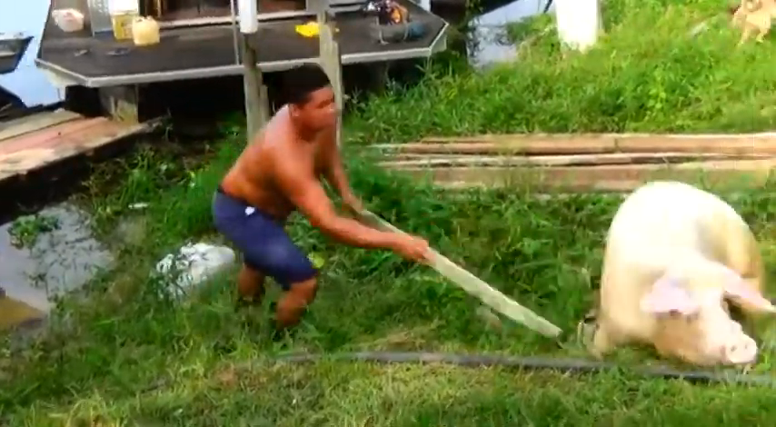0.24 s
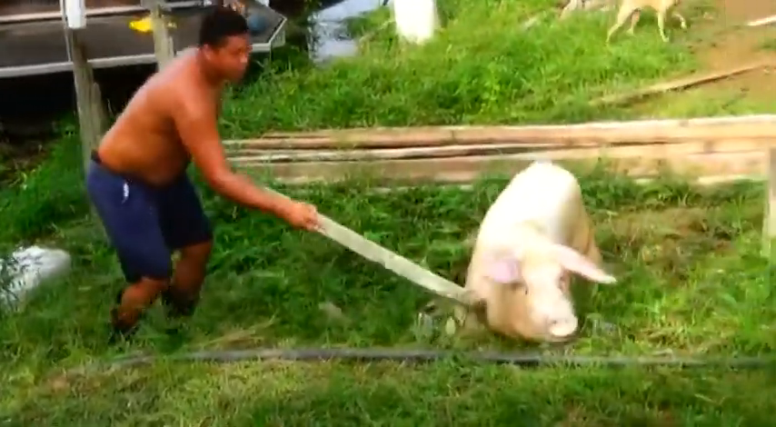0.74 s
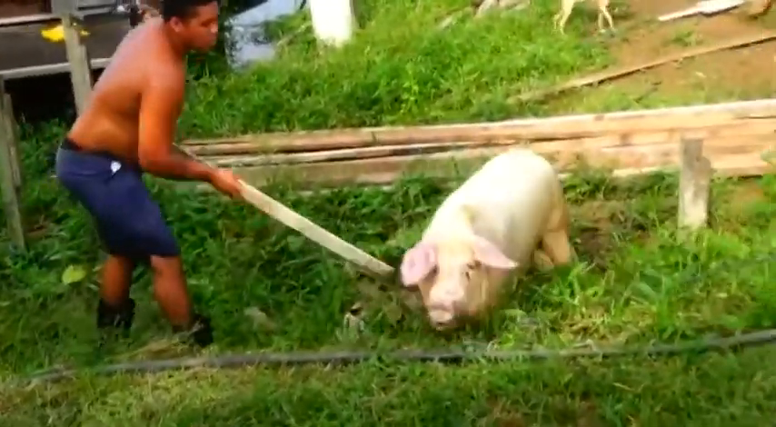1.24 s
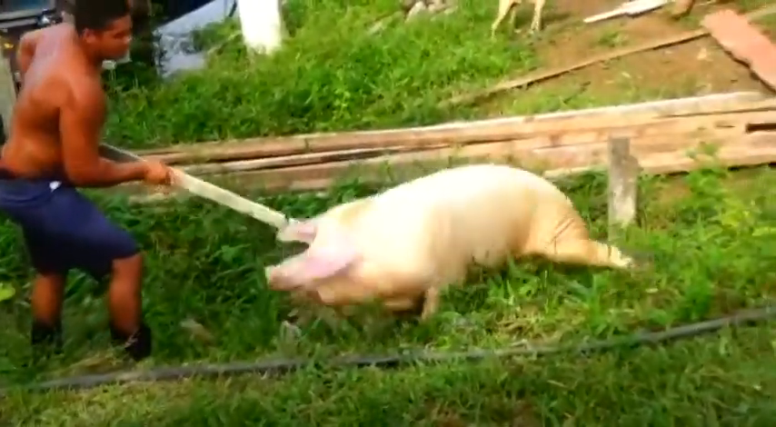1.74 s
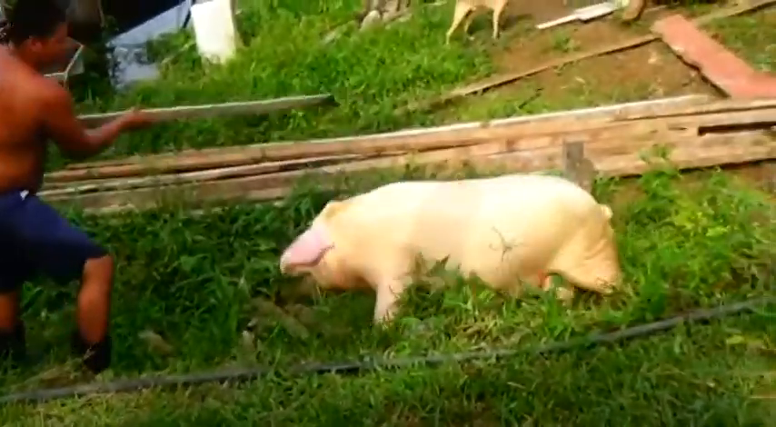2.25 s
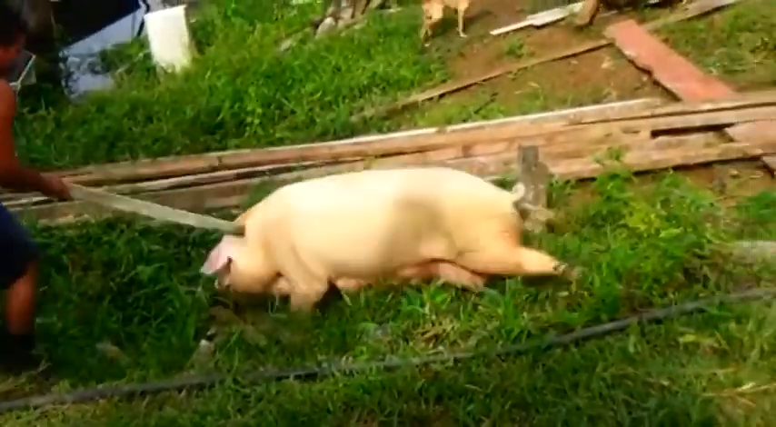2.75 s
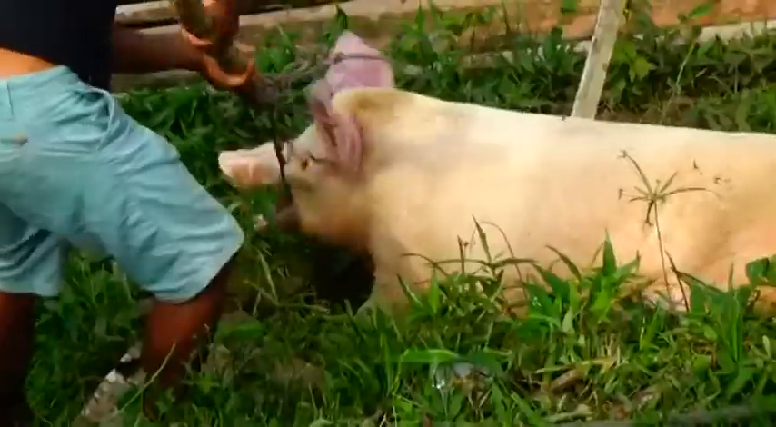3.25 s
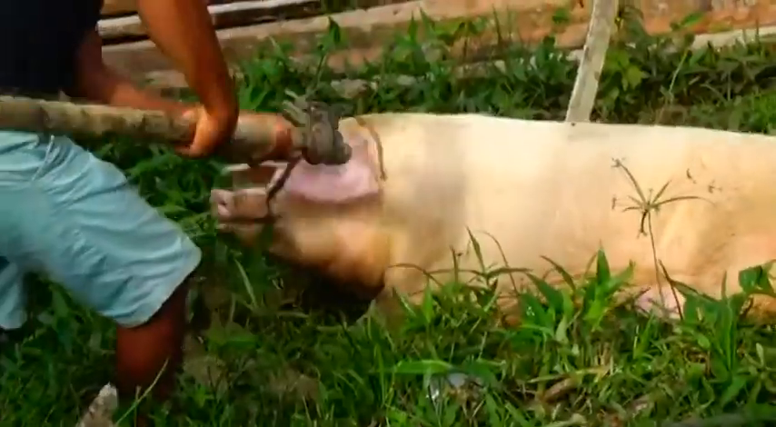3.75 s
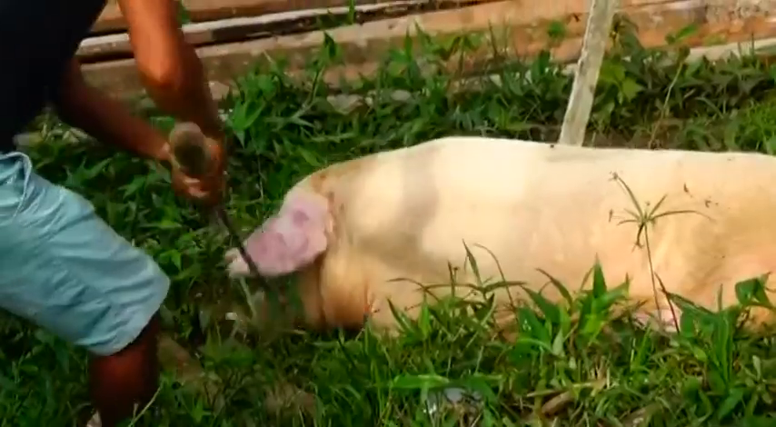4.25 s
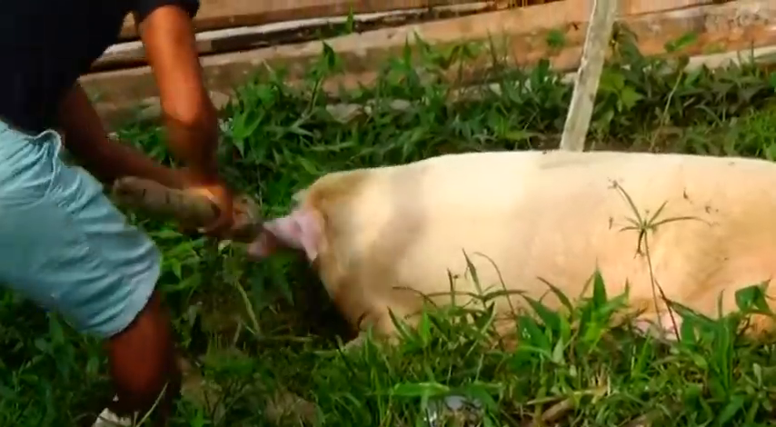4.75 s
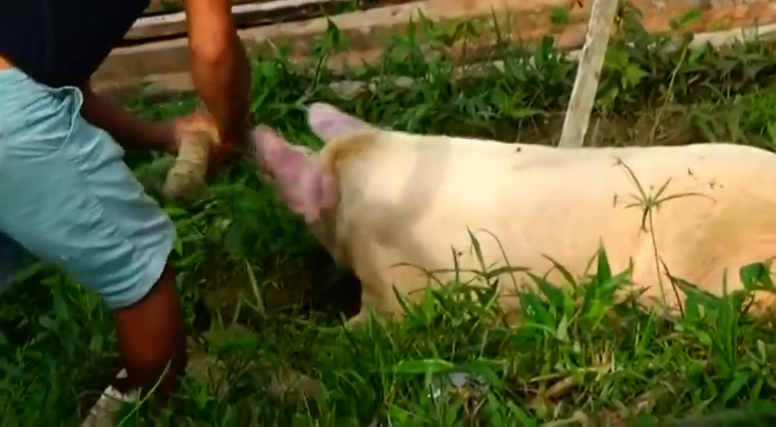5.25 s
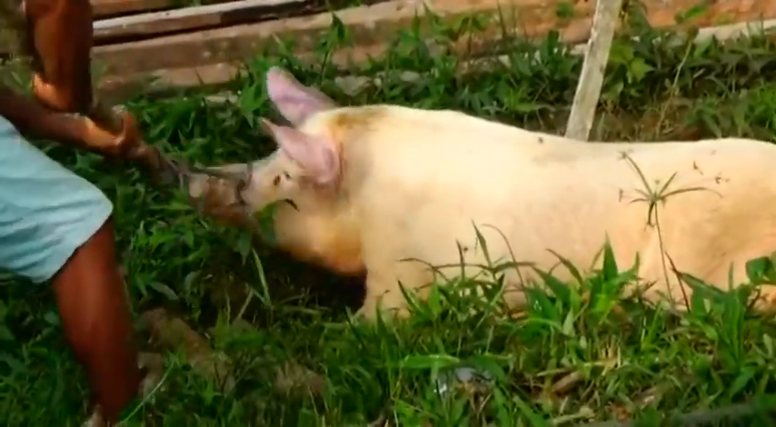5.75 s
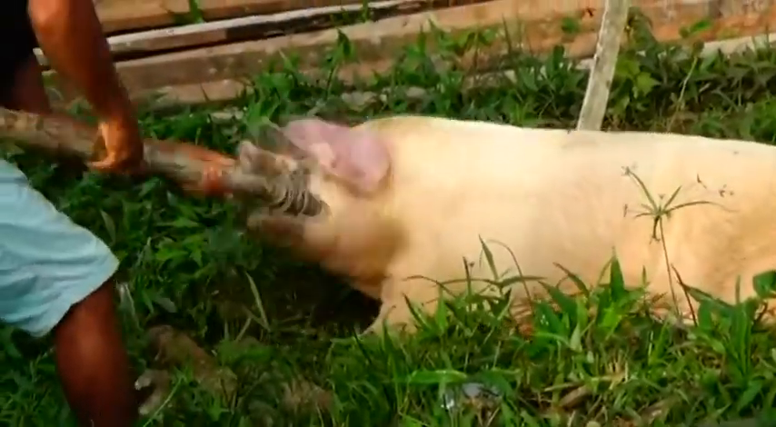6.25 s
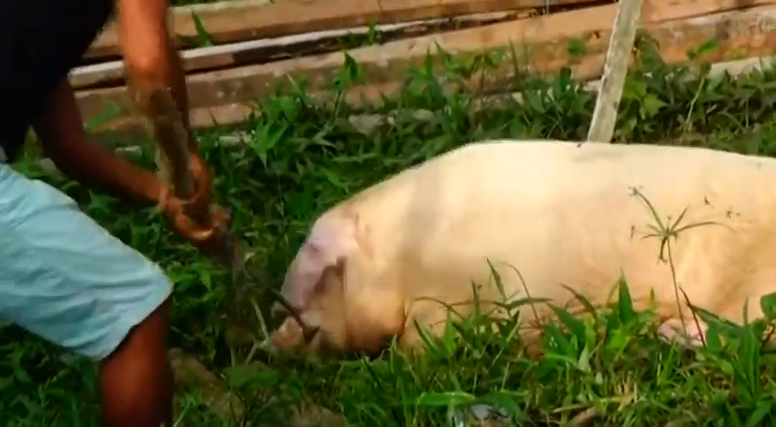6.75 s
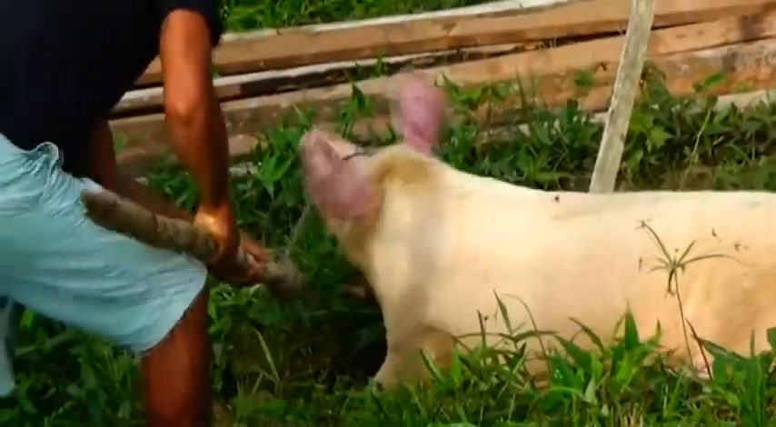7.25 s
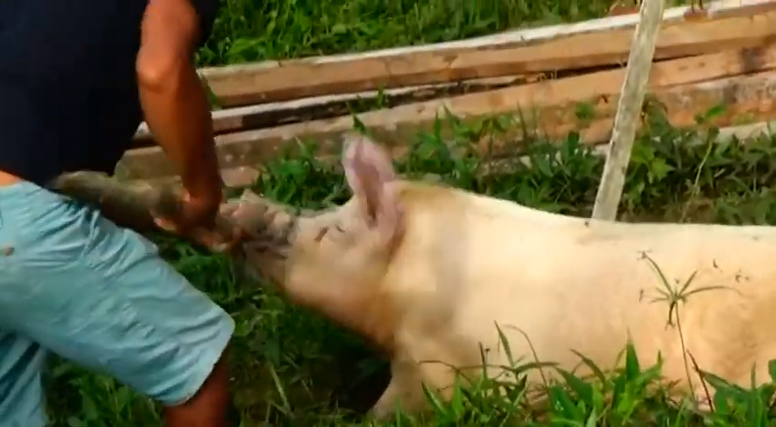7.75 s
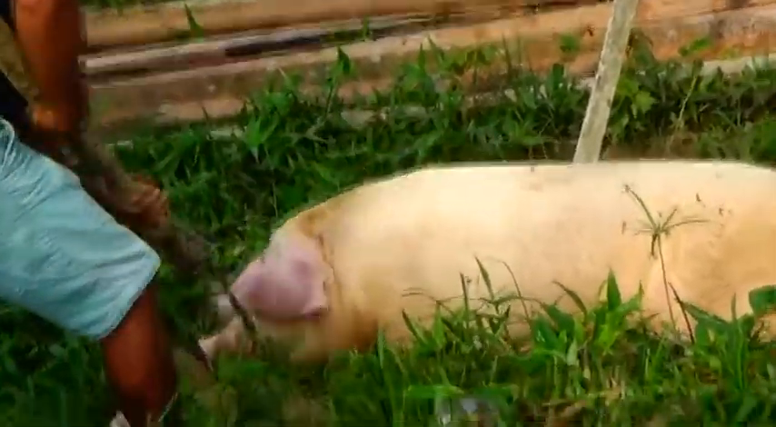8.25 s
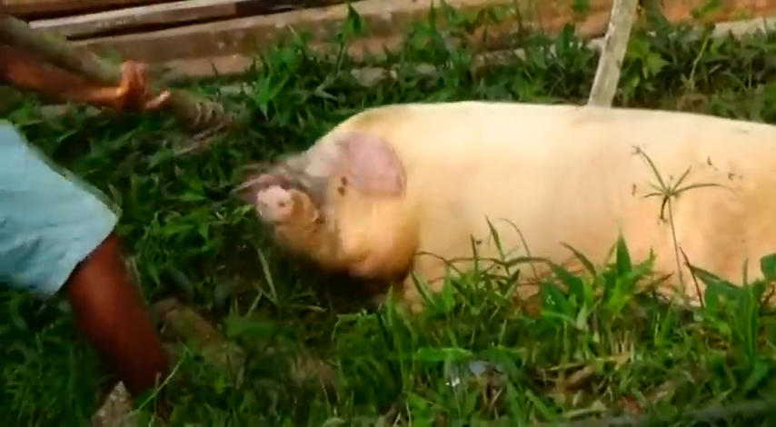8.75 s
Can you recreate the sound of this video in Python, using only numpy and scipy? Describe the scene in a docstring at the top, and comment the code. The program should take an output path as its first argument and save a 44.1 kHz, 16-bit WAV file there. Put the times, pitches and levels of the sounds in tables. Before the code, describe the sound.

A pig screams in rough, high wavering cries with creaks and yelps, then abruptly a distant one-cylinder engine chugs steadily amid insects and a bird.

```python
"""A grassy yard: a pig squeals, a rough high scream over a low throat hum, with creaks and short clear yelps.
Then the ear jumps elsewhere in the yard: a slow one-cylinder engine chugs to the left, insects sing, a bird whistles.
The pig is noise-smeared oscillators, pulses through a throat, fold clicks and coloured air noise; each engine
firing is a struck block and a rising exhaust chirp; birds are gliding tones; the yard is patchy coloured noise."""
import sys
import numpy as np
from scipy import signal
from scipy.fft import rfft, irfft, next_fast_len
from scipy.io import wavfile
from scipy.ndimage import uniform_filter1d, map_coordinates

SR = 44100
rng = np.random.default_rng(int(sys.argv[2]) if len(sys.argv) > 2 else 0)


def digitize_waveform(pressure):
    """Quantize a signal to 16-bit integers and store it at the path in sys.argv[1].

    Rows of a 2-D input are taken as channels; values are limited to [-1, 1].
    """
    field = np.atleast_2d(pressure).T
    bounded = np.clip(field, -1, 1)
    quanta = np.round(bounded * 32767).astype(np.int16)
    wavfile.write(sys.argv[1], SR, quanta)


N = 396900
JUMP_S = 3.1642  # the pig's place before, the engine's place after
STEADY_DB = 1.5  # patchiness of steady noises

# slow slaps of the vocal folds [start t/s, length/s, first and last rate/Hz, first and last level/dB,
# brightness/dB, share of the voice cut between slaps]
CREAKS = [(.41, 0.126, 87.96, 82.9, -25, -17, -2.5, 0.87), (.545, 0.046, 92.2, 93.3, -18.5, -13, -12, 1),
          (.606, 0.07, 67.5, 67.7, -19, -8, -6.5, 0.52), (1.151, 0.1, 44.4, 70.8, -22, -14, -10.5, 0.71),
          (3.013, 0.02795, 78.1, 76.8, -44, -33, 8, 0.96), (3.055, 0.1, 68.15, 78.1, -19, -14.5, -6, 0.66)]
# middle band of the pig's breath noise [f/Hz, density/dB]
BREATH_MID = [(1200, -78), (1950, 4), (2300, -4), (3060, -3.5), (3700, -3.5), (4800, -26), (6200, -30)]


def amp(db):
    """Amplitude factor of a level in dB."""
    return 10 ** (np.asarray(db) / 20)


def unit(x):
    """x scaled to rms 1."""
    return x / np.sqrt(np.mean(x ** 2) + 1e-20)


def along(points, hz):
    """Reads (Hz, value) points on a log frequency axis."""
    f, v = np.transpose(points)
    return np.interp(np.log(hz + 1), np.log(f + 1), v)


def curves(tables, fade_s=0.0035):
    """A gate that is open inside each table's span, then one value per sample for each column."""
    t = np.arange(N) / SR
    gate = 0
    for rows in tables:
        from_edge = np.minimum(t - rows[0][0], rows[-1][0] - t)
        gate = gate + np.clip((from_edge + fade_s) / fade_s, 0, 1)
    s, *cols = np.concatenate(tables).T
    return [np.minimum(gate, 1)] + [np.interp(t, s, c) for c in cols]


def wobble(rate):
    """A smooth random curve, rate knots a second."""
    at = np.arange(0, N + 16, 16)
    knots = rng.standard_normal(int(N * rate / SR) + 4)
    return np.interp(np.arange(N), at, map_coordinates(knots, [at * rate / SR]))


def filtered(x, response):
    """x times a complex response of frequency."""
    m = next_fast_len(N + SR // 2)
    return irfft(rfft(x, m) * response(np.fft.rfftfreq(m, 1 / SR)), m)[..., :N]


def noise(spectrum, patchy_db, tall=5, long=10):
    """Coloured noise of rms 1 with patches of random gain, tall bins by long frames."""
    z = signal.stft(rng.standard_normal(N), nperseg=512)[2]
    field = uniform_filter1d(rng.standard_normal(z.shape), size=tall, axis=0)
    field = uniform_filter1d(field, size=long, axis=1)
    x = signal.istft(z * amp(patchy_db * unit(field)), nperseg=512)[1][:N]
    return unit(filtered(x, lambda hz: amp(along(spectrum, hz))))


def phase(hz):
    """Running phase in radians of a gliding pitch."""
    return 2 * np.pi * np.cumsum(hz) / SR


def fuzzy(turn, rough, spread_hz):
    """A tone that trades part of its power for a noise band around it."""
    share = np.clip(rough, 0, 1)
    smear = wobble(spread_hz) * np.sin(turn) + wobble(spread_hz) * np.cos(turn)
    return np.sqrt(2 - 2 * share) * np.sin(turn) + np.sqrt(share) * smear


def resonator(f, centre, width):
    """Complex response of one resonance, 1 at its centre."""
    return 1j * f * width / (centre * centre - f * f + 1j * f * width)


def yard(late):
    """Far machinery drones, leaves rustle and insects buzz in one high band, all as patchy noise."""
    # [t/s, drone level/dB, insect level/dB, leaf level before a trim/dB], one list for each place
    levels = [
        [(0, -53, -58, -46), (1, -49, -61, -45.5), (2.7, -53, -54.5, -40.5), (3.16, -49, -56, -46)],
        [(3.17, -50.5, -56.5, -44.5), (6, -49, -54.5, -46), (9, -49, -53.5, -45)],
    ]
    # drone colour in the pig's place, then in the engine's place [f/Hz, density/dB]
    drone_before = [(18, -66), (30, -44), (166, -0.5), (540, -0.5), (1270, -3), (1830, -5.5), (3330, -10),
                    (3550, -49), (5000, -27), (6500, -62), (11000, -120)]
    drone_after = [(20, -11), (60, -11), (150, -2.5), (255, -6.5), (340, 1), (440, -4), (510, 2.5),
                   (630, -1), (900, -1.5), (1250, -14), (1750, -5.5), (2300, -8), (3500, -11.5),
                   (5000, -30), (8000, -60)]
    # leaf rustle [f/Hz, density/dB]
    leaf_color = [(2060, -45), (3500, -15), (4550, -11.5), (8240, -8.5), (9700, -8.5), (10900, -10.5),
                  (13800, -21), (15600, -25)]

    _, drone_db, insect_db, leaf_db = curves(levels)
    drone = np.where(late, noise(drone_after, STEADY_DB), noise(drone_before, 2 * STEADY_DB))
    insect_color = [(7500, -84), (9300, -0.5), (9750, 0.5), (10200, -4.5), (12500, -84)]
    insects = noise(insect_color, 0.81) * amp(1.6 * wobble(150))
    leaves = noise(leaf_color, 3.8)
    return amp(drone_db) * drone + amp(insect_db) * insects + amp(leaf_db - 6.5) * leaves


def rushing_air(low, air_db, hiss_db, mouth_hz):
    """Turbulent breath: air rings in the open mouth among three noise bands, chopped by the humming folds."""
    # chesty low band, then hissing top band [f/Hz, density/dB]
    body_color = [(250, -19), (450, -14.5), (640, -4.5), (840, -75), (1050, 2.5), (1250, -6), (1450, 4.5),
                  (1700, 4), (1950, -20), (2400, -62)]
    hiss_color = [(2650, -37), (4500, -4), (5890, 1), (7210, -6), (8330, -0.5), (10200, -3.5),
                  (12400, -13.5), (15500, -35)]

    def streaky(spectrum):
        return noise(spectrum, 4.5, tall=2, long=12)

    # as the breath weakens the low band is lifted against the rest, up to a limit
    body_db = np.minimum(-2 + (-20 - air_db), 14)
    braid = 1 + 1.2 * np.cos(low) + .8 * np.cos(2 * low)  # the hum splits each band into strands
    ring = fuzzy(phase(mouth_hz), 1, 260) + .5 * fuzzy(phase(1.5 * mouth_hz), 1, 260)
    air = 0.29 * braid * ring / 1.4 + .33 * streaky(BREATH_MID)
    air = air + amp(hiss_db + 2.0) * streaky(hiss_color) + amp(body_db - 10.0) * streaky(body_color)
    flutter = amp(air_db + 1.5 * wobble(90)) * (1 + .5 * np.cos(low))
    return flutter * air


def held_tones():
    """Steady tones under the scream, each swelling to a peak and sinking."""
    # [start t/s, length/s, f/Hz before waver, peak level/dB before flicker]
    tones = [(0.407, .1, 740, -22), (1.36, 0.38, 1008, -14.5), (3.059, 0.079, 581.3, -25)]
    peak_share, edge_db = 0.59, -15.5  # where in its length the peak falls; level of both ends against it

    swells = [[(s, f, g + edge_db), (s + peak_share * d, f, g), (s + d, f, g + edge_db)]
              for s, d, f, g in tones]
    on, hz, db = curves(swells)
    tone = fuzzy(phase(hz * (1 + .02 * wobble(14))), 0.45, 140)
    return on * amp(db + 3.2 * wobble(29.95)) * tone


def squeal(chop):
    """Two oscillators at once: the low hum beats against the high scream and gives it side lines."""
    # scream [t/s, pitch f/Hz before waver, level/dB, roughness 0-1]
    scream_rows = [
        [(0.0, 1561, -33, 0), (.05, 1547, -33, 0.15), (.09, 1510, -29, 0.02), (0.17, 1427, -28, 0),
         (.21, 1417, -27, 0.05), (0.25, 1344, -27, 0.23), (.275, 1272, -21.5, 0), (0.3, 1244, -16, 0),
         (.36, 1234, -15.5, 0.04), (0.39, 1233, -18, 0.57), (0.43, 1325, -26.5, 0.4), (0.57, 1319, -27.5, 0.45),
         (0.64, 1366, -23, 0.4), (0.66, 1356, -14, 0.2)],
        [(1.22, 1022, -33, 0.35), (1.245, 1056, -19.5, .4), (1.344, 1013, -28.5, 0.49), (1.55, 1116, -19, 0.5),
         (1.66, 1181, -25, 0.65), (1.7, 1257, -19, 0.53), (1.84, 1408, -24.5, 0.55), (1.986, 1581, -26, 0.34),
         (2.128, 1525, -16, 0.04), (2.196, 1352, -26, 0.34), (2.27, 1203, -18.5, 0.58),
         (2.338, 1080, -22, 0.52), (2.384, 1002, -28, 0.34), (2.41, 1156, -20, 0.17), (2.5, 1310, -33, 0.22)],
        [(3.015, 1214, -42, 0.42), (3.09, 1172, -27, 0.39), (3.17, 1280, -21, 0.44)],
    ]
    # throat hum [t/s, low tone f/Hz before waver, level/dB]
    hum_rows = [
        [(0.0, 382.8, -44.5), (0.17, 325.2, -48.5), (.24, 332.6, -42.5), (0.344, 297, -45), (0.5, 297.1, -39.5),
         (0.62, 309.8, -28.5)],
        [(1.17, 283, -34), (1.23, 287.5, -23.5), (1.4, 273.7, -32), (1.65, 279.9, -40), (1.7, 323.8, -37),
         (1.994, 394.1, -39), (2.194, 353.2, -35.5), (2.294, 348.7, -52), (2.38, 379.6, -31.5)],
        [(3.03, 300.6, -38), (3.17, 312.8, -34)],
    ]
    # rushing air [t/s, level/dB, hiss against it/dB, mouth resonance f/Hz]
    air_rows = [
        [(0.0, -21, -7, 3140), (0.08, -22, -5.5, 3060), (0.2, -27, 0, 3080), (0.33, -32, 8, 2510),
         (0.416, -21.5, -19, 2870), (0.564, -51.5, -3.5, 2710), (0.608, -42, 2, 2570), (0.688, -34, -7.5, 2460),
         (0.76, -65, 13, 2530)],
        [(0.88, -73, 14, 2650), (0.912, -45, 4, 2650), (0.94, -32, -10, 2650), (1.04, -49, -1.5, 2650)],
        [(1.165, -64, 6, 2660), (1.173, -54, 0, 2730), (1.269, -25, -9, 2920), (1.445, -19.5, -11.5, 3160),
         (1.713, -24.5, -6.5, 2640), (1.967, -19, -7.5, 3210), (2.027, -22, -3.5, 3060),
         (2.045, -15, -10.5, 3080), (2.107, -22.5, -3, 3050), (2.277, -20, -8.5, 2600),
         (2.453, -27.5, -17, 2700), (2.633, -33, -21, 2560), (2.689, -38, -4, 2670), (2.74, -48, -32, 2560)],
        [(3.0, -60, 4, 2580), (3.054, -34.5, -21, 2490), (3.16, -21, -10.5, 2950), (3.17, -41, -3, 2920)],
    ]
    # lines the hum adds around each overtone [multiple of the hum, level/dB]
    side_lines = [(0, 0), (.5, -6), (1, -4), (-.5, -9)]
    nasal_above_hz, nasal_db = 345, 0.5  # a nasal tone rides this far above the low tone
    mouth_width_hz = 356
    torn_db = 4.5  # each side line breaks up on its own

    hum_on, low_hz, low_db = curves(hum_rows)
    low = phase(low_hz * (1 + 0.0142 * wobble(40.9)))
    nasal = amp(nasal_db) * fuzzy(phase(low_hz + nasal_above_hz), 0.42, 90)
    hum = hum_on * amp(low_db) * (fuzzy(low, 0.53, 60) + nasal)

    air_on, air_db, hiss_db, mouth_hz = curves(air_rows)
    on, hz, db, rough = curves(scream_rows)
    waver = .01 * wobble(50) + .012 * wobble(16)  # fast and slow unsteadiness
    high = phase(hz * (1 + (0.195 + 2 * rough) * waver))

    def strands(k, smear):
        return sum(amp(g + torn_db * wobble(35)) * fuzzy(k * high + m * low, smear, 130)
                   for m, g in side_lines)

    scream = fuzzy(high, .7 * rough + .08, 200) + .4 * fuzzy(high + low / 2, rough + .2, 200)
    scream = amp(db) * scream
    # the octave follows the breath, loudest where it meets the mouth resonance
    octave = amp(air_db - 2 - 4.8 * rough) / np.hypot(1, (2 * hz - mouth_hz) / mouth_width_hz)
    scream = scream + octave * strands(2, .6 * rough + .45)
    for k in range(3, 7):  # upper overtones follow the hiss and blur into wavy bands
        upper_db = air_db + np.minimum(hiss_db, 0) - 4.5 - 2.5 * (k - 3) - 2
        scream += amp(upper_db) * strands(k, .5 * rough + .6)
    beat = 1 + 0.08 * np.cos(low) + 0.089 * np.cos(2 * low)

    leak = amp(on * (6.9 * rough - 1.5))  # a clear scream leaks less air
    air = air_on * rushing_air(low, air_db, hiss_db, mouth_hz) * leak
    return held_tones() * (1 + 2 * chop) / 3 + chop * (hum + on * beat * scream + air)


def through_nose(pig):
    """The open nose absorbs one band of the voice while its passage is open."""
    # nasal moments [start t/s, end t/s, opening 0-1, absorbed centre f/Hz]
    openings = [(0.106, 0.327, 0.4, 2280), (.26, 0.417, 0.95, 1800), (0.273, 0.386, 1, 3470),
                (1.29, 1.897, 0.93, 1947)]
    # absorbed band [share of its centre f, level/dB]
    notch = [(.85, 0), (.93, -12), (.98, -34), (1.02, -34), (1.07, -12), (1.15, 0)]
    move_s = .08  # time the nose takes to open or shut

    for a, b, wide, nose_hz in openings:
        on, nasal = curves([[(a, 0), (a + move_s, wide), (b - move_s, wide), (b, 0)]])
        share = on * np.clip(nasal - 0.09 * np.abs(wobble(15)), 0, 1)
        absorbed = filtered(pig, lambda hz: amp(along(notch, hz / nose_hz)))
        pig = pig + share * (absorbed - pig)
    return pig


def throat(f):
    """The pig's fixed airway resonances, with alternating sign."""
    # [centre f/Hz, width/Hz, level/dB]
    airway = [(670, 610, -2), (977, 300, 5.5), (1280, 56, -3), (1890, 540, -14.5), (2600, 117, -0.5),
              (3900, 550, -64)]
    return sum((-1) ** k * amp(db) * resonator(f, c, w) for k, (c, w, db) in enumerate(airway))


def slaps():
    """Rows (s, dB, brightness dB, cut) of single fold slaps: rate and strength glide through each creak."""
    scatter_s, scatter_db = .001, 2
    rows = []
    for s, d, rate0, rate1, db0, db1, bright_db, cut in CREAKS:
        u, chance = np.linspace(0, 1, 200), rng.standard_normal((30, 2))
        done = d * (rate0 * u + (rate1 - rate0) * u ** 2 / 2)  # slaps so far
        shares = np.interp(np.arange(int(done[-1]) + 1), done, u)
        for at, (late, size) in zip(shares, chance):
            slap_db = db0 + (db1 - db0) * at + scatter_db * size
            rows.append((s + d * at + scatter_s * late, slap_db, bright_db, cut))
    return rows


def chopped(rows, t60):
    """While the folds creak, the voice comes in bursts: open at each slap, shut before the next."""
    t, open_, creaking = np.arange(N) / SR, np.zeros(N), np.zeros(N)
    for s, *_, cut in rows:
        near = slice(round(s * SR) - 200, round(s * SR) + 800)
        since = t[near] - s
        open_[near] = np.maximum(open_[near], (since >= 0) * amp(-60 * np.abs(since) / t60))
        creaking[near] = np.clip(cut, 0, 1)
    return 1 + uniform_filter1d(creaking, size=300) * (1.66 * uniform_filter1d(open_, size=20) - 1)


def creaks(rows):
    """Single slow slaps of the folds, each a click that rings the throat and a short puff."""
    dull, bright, t = np.zeros(N + SR), np.zeros(N + SR), np.arange(900) / SR
    click = 0.26 * amp(-60 * t / 0.00031)
    ring = np.sin(2 * np.pi * 1320 * t) * amp(-60 * t / 0.0065)  # the half-shut mouth rings on
    sharp_front = 1 + 2.5 * amp(-60 * t / .005)
    for s, db, bright_db, _ in rows:
        here = slice(round(s * SR), round(s * SR) + len(t))
        puff = amp(-60 * t / .03) * rng.standard_normal(len(t))
        dull[here] += amp(db) * (1.9 * puff + click + .5 * ring)
        bright[here] += amp(db + bright_db + 2) * puff * sharp_front
    throaty = filtered(dull[:N], lambda hz: throat(hz) / (1 + (hz / 3600) ** 4))
    return throaty + filtered(bright[:N], lambda hz: amp(along(BREATH_MID, hz)))


def yelps():
    """Short cries: fold pulses through the throat; an open mouth lifts the upper overtones."""
    # short cries [start t/s, length/s, pitch f/Hz after the rise, before the fall, level/dB there, there,
    # mouth opening/dB, roughness 0-1]
    short_cries = [(0.592, .14, 348, 318, -16.5, -21, 2, 0.6),
                   (0.884, .13, 332.4, 317, -15.5, -21, -2, 0.19)]
    # a longer cry that frays [t/s, pitch f/Hz, level/dB, mouth opening/dB, roughness, two lowest tones/dB]
    last_cry = [(2.38, 266.6, -29, -20, 0.12, 4), (2.42, 300.2, -11, -8, 0.21, -9),
                (2.46, 303.8, -4.5, -16.5, .15, -11.5), (2.53, 333, -13.5, -7, 0.41, -5),
                (2.585, 373, -22.5, 1, .65, 5), (2.62, 386, -13.5, -11, 0.7, -2.5),
                (2.65, 331.7, -15.5, -9, 0.84, -6), (2.68, 269, -29, -14, 1.31, 2)]
    rise_s, fall_s = 0.036, .045
    slack, edge_db, shut_db = .71, -13, -21  # slack folds (pitch share) and a shut mouth at both ends
    frays_per_s = 6  # roughness grows through a yelp
    open_jaw_hz = 1600  # the wide jaw favours overtones near this pitch

    cries = []
    for s, d, f0, f1, g0, g1, wide, r in short_cries:
        frayed = r * (1 + frays_per_s * d)
        cries.append([(s, slack * min(f0, f1), g0 + edge_db, wide + shut_db, r, 0),
                      (s + rise_s, f0, g0, wide, r, 0),
                      (s + d - fall_s, f1, g1, wide, frayed, 0),
                      (s + d, slack * f0, g1 + edge_db, wide + shut_db, frayed, 0)])
    on, hz, db, open_db, rough, low_db = curves(cries + [last_cry])
    turn = phase(hz * (1 + 0.00688 * wobble(60)))
    tone = 0
    for k in range(1, 13):
        if k > 3:
            lift = amp(open_db) * (1 + 1.6 / (1 + ((k * hz - open_jaw_hz) / 300) ** 2))
        else:
            lift = amp(low_db * (k < 3))
        way = throat(k * hz)
        overtone = fuzzy(k * turn + np.angle(way), rough * min(1, k / 3), 210)
        tone = tone + lift * np.abs(way) * overtone
    level = amp(db - 7.5 + 0.86 * np.minimum(rough, 1) * wobble(18))
    alternation = 1 + 0.4 * rough * np.cos(turn / 2)  # strong and weak pulses alternate
    return on * level * tone * alternation


def ticks():
    """Small dry ticks in the grass: short puffs of noise, each around its own centre."""
    # [t/s, level/dB, centre f/Hz]
    puffs = [(1.105, -40, 8800), (1.128, -36, 7890), (2.872, -37.5, 1490), (2.886, -35, 1426)]
    out, t = np.zeros(N), np.arange(900) / SR
    for s, db, hz in puffs:
        band = signal.butter(1, [.6 * hz, 1.5 * hz], "band", fs=SR)
        puff = signal.lfilter(*band, rng.standard_normal(len(t)))
        out[round(s * SR):][:len(t)] += amp(db - 60 * t / 0.068) * 2 * puff
    return out


def firings():
    """Sample times of the firings: the governor hunts, so a small lag swings slowly to and fro."""
    first_s, cycle_s = 3.19962, .0708673
    hunt_s, swing, latest = .0013, 36.5, 23.5  # greatest lag; firings a swing; firing of greatest lag
    n = np.arange(-1, 83)
    lag = hunt_s * np.cos(2 * np.pi * (n - latest) / swing)
    return np.round((first_s + cycle_s * n + lag) * SR).astype(int)


def engine():
    """Each firing: a knock in the block, then the exhaust pipe lets out a chirp that rises, low notes first."""
    # [t/s, exhaust level/dB, knock level/dB, knock pitch f/Hz, buzz of a loose part/dB], before trims and scatter
    course = [(3.17, -47.5, -39.5, 2108, -60), (4, -44.5, -38.5, 1947, -58), (5, -44, -38.5, 1810, -60),
              (6, -42.5, -39, 1940, -60), (6.9, -42.5, -41.5, 1940, -52.5), (7.5, -42, -38, 1880, -52.5),
              (8.3, -42.5, -35.5, 1633, -49.5), (9, -43.5, -36.5, 1670, -55.5)]
    # noise of the knock [f/Hz, density/dB]
    knock_color = [(60, -25), (400, -13.5), (760, -7), (1050, -5.5), (1300, -23), (1600, -0.5), (1960, 1),
                   (2610, -8.5), (2990, -11), (3350, -11), (5150, -21), (9000, -18), (11700, -32),
                   (19800, -120)]
    # exhaust pipe resonances [centre f/Hz, width/Hz, lift as a factor]
    pipe_modes = [(335, 24, 1.6), (440, 28, 2.6), (560, 26, 1.2), (640, 34, 2.2), (730, 26, 1.4),
                  (880, 60, 1.2)]
    pipe_low_hz = 120  # the exhaust radiates little below this
    lead_s, lead_pitch = .014, .9  # lead-in before the main blow; pitch share of the softer knock

    _, exhaust_db, knock_db, knock_hz, rattle_db = curves([course])
    at = firings()
    t = np.arange(3200) / SR - lead_s
    after = np.maximum(t - .0012, 0)
    sweep = phase((240 + 470 * np.clip(after / 0.013, 0, 1)) * (after > 0))
    # a dip, then a second push as the wave returns
    swell = 1 - .5 * np.exp(-((after - .0072) / 0.0022) ** 2) + 0.5 * np.exp(-((after - .01) / 0.0004) ** 2)
    push = swell * np.clip(after / 0.0025, 0, 1) * amp(-60 * np.maximum(after - .012, 0) / 0.026)
    thump = np.sin(2 * np.pi * 185 * after) * amp(-60 * after / .06) * np.clip(after / .003, 0, 1)
    valve = 0.17 * np.sin(2 * np.pi * 560 * (t + 0.00978)) * np.exp(-((t + 0.0016) / 0.003) ** 2)

    lead = 0.75 * np.exp(-((t + 0.0045) / 0.003) ** 2)  # a softer, lower knock before the main blow
    main = np.exp(-(t / 0.0023) ** 2) + 0.18 * np.exp(-((t - .005) / 0.009) ** 2)
    snap = np.exp(-(t / .0018) ** 2)  # the upper modes sound only at the main blow
    burst = 0.92 * (lead + main) + 2.6 * (t > 0) * amp(-60 * t / 0.052)

    def pipe_response(f):
        modes = 1 + sum(g * resonator(f, c, w) for c, w, g in pipe_modes)
        return f ** 4 / (f ** 4 + pipe_low_hz ** 4) * modes

    pipe, ring, gate = np.zeros((3, N + SR))
    chance = rng.standard_normal((len(at), 5))
    for i, (size, tone, hard, jog, gas) in zip(at - round(lead_s * SR), chance):
        chirp = push * np.sin(sweep * amp(.05 * gas))
        pipe[i:i + len(t)] += amp(1.03 * size) * (chirp + 0.71 * thump + valve)
        i += round(30 * jog)  # the knock lands a little early or late
        # modes of the block, struck unevenly
        block = 2 * np.pi * knock_hz[min(i, N - 1)] * amp(0.37 * tone) * t
        soft_knock = lead * amp(3 * gas) * np.sin(lead_pitch * block + 3 * size)
        upper = .6 * amp(3 * jog) * np.sin(1.35 * block) + .55 * amp(3 * size) * np.sin(1.95 * block)
        ring[i:i + len(t)] += amp(1.5 * hard) * (main * np.sin(block) + soft_knock + snap * upper)
        gate[i:i + len(t)] += amp(hard) * burst
    exhaust = unit(filtered(pipe[:N], pipe_response))
    clatter = unit(filtered(gate[:N] * noise(knock_color, STEADY_DB), pipe_response))
    knock = 0.7 * unit(ring[:N]) + clatter
    rattle_color = [(500, -77), (900, 8.0), (1600, 5.5), (2400, -86)]
    rattle = (1 + .5 * gate[:N]) * noise(rattle_color, STEADY_DB)
    return amp(exhaust_db - 4.0) * exhaust + amp(knock_db - 8.0) * knock + amp(rattle_db) * rattle


def bird():
    """Two arched whistles on the third overtone, the second joining near the crest; thin calls farther off."""
    # near whistles [start t/s, crest t/s, end t/s, top of the third overtone f/Hz]
    whistles = [(3.62, 3.87, 3.95, 4950), (8.47, 8.62, 8.76, 4880)]
    # shape of a whistle [0 start 1 crest 2 end, share of top pitch, level/dB before flicker]
    arch = [(0, .85, -61), (.35, .955, -54.5), (1, 1, -54.5), (1.5, .98, -55), (2, .9, -62)]
    # farther birds [start t/s, length/s, top f/Hz]
    faint_calls = [(4.4, .52, 5550), (4.9, .42, 4300), (5.47, .1, 5800), (5.59, .17, 3550),
                   (6.44, .14, 5500)]
    sag_hz, faint_db, broken_db = 200, -67, 4  # far calls sag in pitch and come in broken chirps

    arches = [[(np.interp(u, range(3), span), share * top, g) for u, share, g in arch]
              for *span, top in whistles]
    on, hz, db = curves(arches, fade_s=0.052)
    turn = phase(hz * (1 + 0.0032 * wobble(60)))
    second = .7 * (hz > 4650) * np.sin(turn * 2 / 3)
    near = on * amp(db + 2 * wobble(40)) * (fuzzy(turn, .55, 220) + second)

    glides = [[(s, f - sag_hz), (s + d / 5, f), (s + d, f - sag_hz / 2)] for s, d, f in faint_calls]
    on, hz = curves(glides, fade_s=.02)
    return near + on * amp(faint_db + broken_db * wobble(18)) * fuzzy(phase(hz), 0.52, 150)


def echo(x):
    """Sheds and fences answer with a stereo noise tail, each frequency dying at its own speed."""
    # colour of the echo [f/Hz, level/dB]
    walls = [(60, -75), (300, -6), (1000, 8.5), (3000, 14.5), (8000, 11.5), (14000, -77)]
    # decay by 60 dB [f/Hz, time/s]
    decay = [(200, 0.67), (2000, 0.37), (10000, 0.3)]
    hz, t, z = signal.stft(rng.standard_normal((2, SR // 2)), SR, nperseg=256)
    tail_db = along(walls, hz)[:, None] - 60 * t / along(decay, hz)[:, None]
    tail = signal.istft(z * amp(tail_db), SR, nperseg=256)[1]
    delayed = np.pad(x, (300, 0))[None]
    return signal.fftconvolve(delayed, tail / np.linalg.norm(tail[0]), axes=1)[:, :N]


def scene():
    """The pig's place, then the engine's place, each with its echo, over the air of the yard."""
    # pig's place in the stereo field [t/s, left minus right level/dB]
    pig_pan = [(0.0, -3), (0.65, 0), (1.2, -1.5), (2.5, 2), (3.17, 0)]
    # no bass from a small larynx [f/Hz, level/dB]
    larynx = [(100, -18), (230, -1.5)]
    centred_hz = 215  # bass below this reaches both ears nearly alike

    late = np.arange(N) >= JUMP_S * SR
    rows = slaps()
    voice = squeal(chopped(rows, .04)) + yelps() + creaks(rows)
    pig = through_nose(filtered(voice, lambda hz: amp(along(larynx, hz))))
    pan_db = curves([pig_pan])[1]
    near = pig * amp([pan_db / 2, -pan_db / 2]) + amp(-14.5) * echo(pig) + ticks()

    motor = engine()
    far = motor + bird() + amp(-17.0) * echo(motor)[0]
    far = far * amp([[2.1], [-2.4]]) + amp(-10.5) * echo(motor)

    air, other = yard(late), yard(late)
    air = np.array([air + 0.015 * other, air - 0.32 * other])
    air = air * amp(late * np.array([[1.6], [-2]]))

    both = np.where(late, far, near) + air
    side = filtered((both[0] - both[1]) / 2, lambda hz: hz ** 2 / (hz ** 2 + centred_hz ** 2))
    return both.mean(0) + np.array([side, -side])


def record(dry):
    """The microphone drops deep bass, a fast gain control evens out loud cries, peaks round off, the top is cut."""
    top_hz = 15700
    thin = signal.sosfilt(signal.butter(2, 70, "high", fs=SR, output="sos"), dry)
    level = np.sqrt(np.abs(uniform_filter1d(np.mean(thin ** 2, 0), size=400)))
    even = thin * np.minimum(1, (.1 / (level + 1e-9)) ** .5)
    soft = even / (1 + np.abs(even / .55) ** 4) ** (1 / 4)
    return filtered(soft, lambda hz: hz < top_hz)


dry = scene()
out = record(dry)
digitize_waveform(out)
```